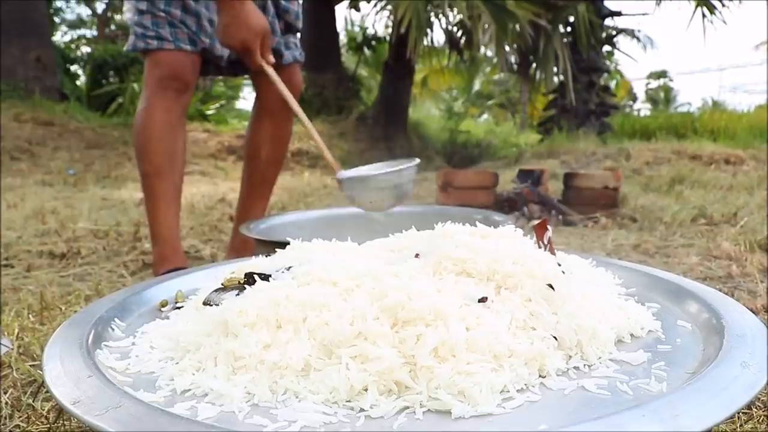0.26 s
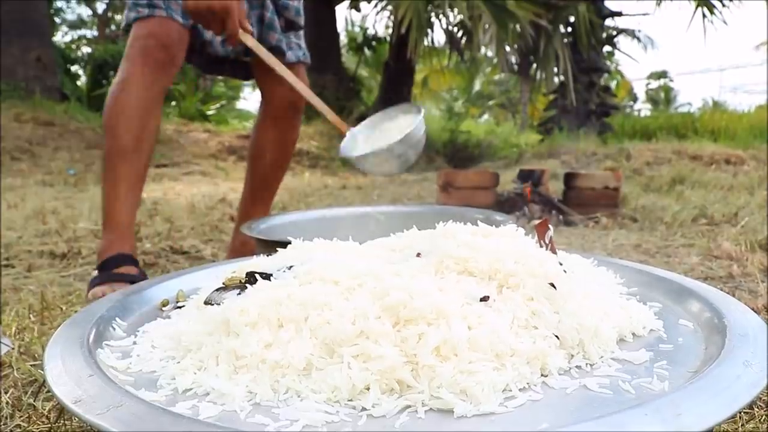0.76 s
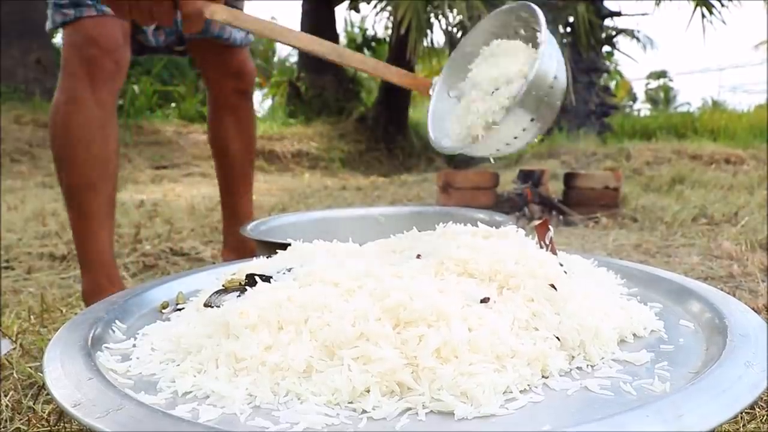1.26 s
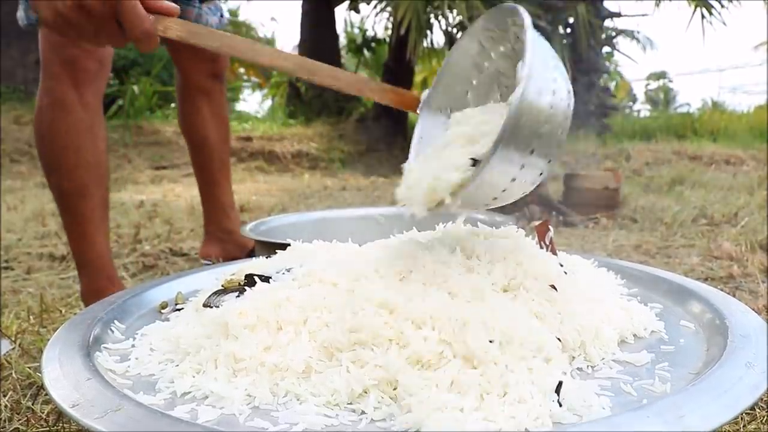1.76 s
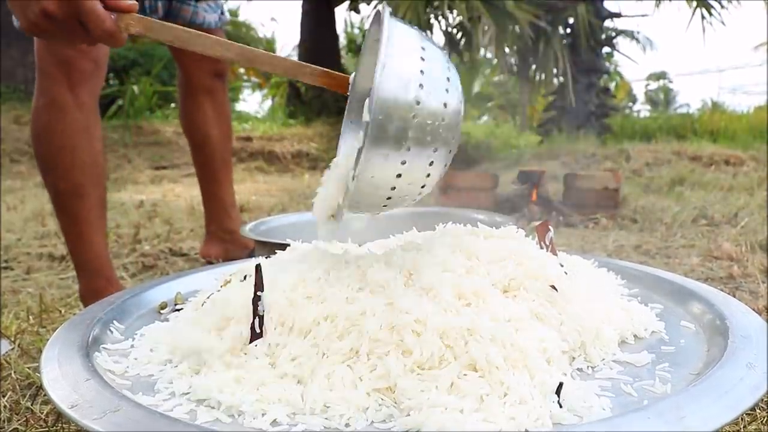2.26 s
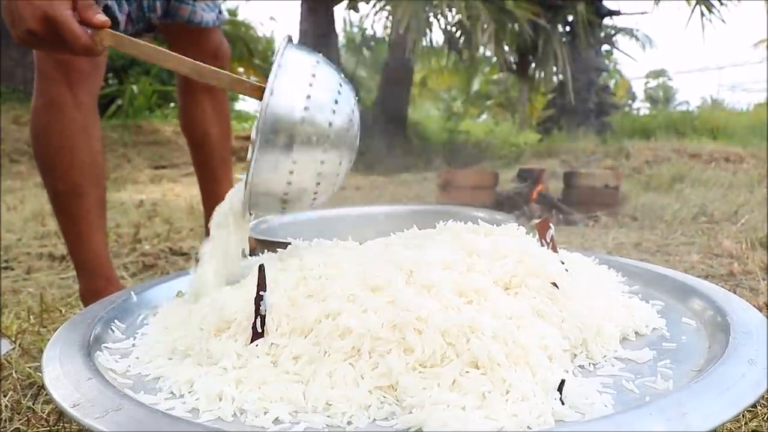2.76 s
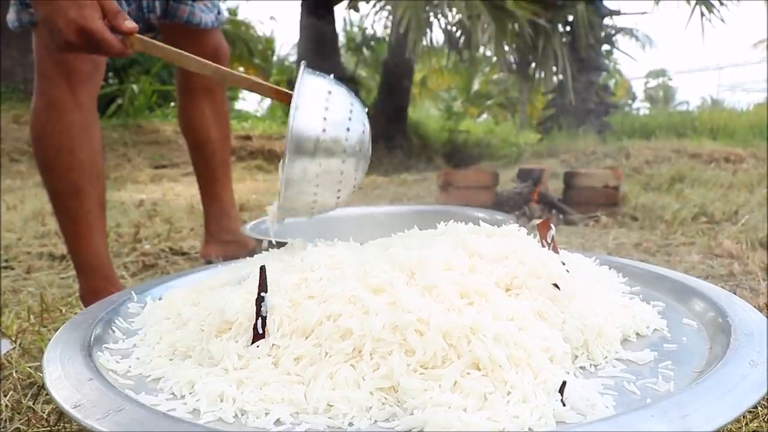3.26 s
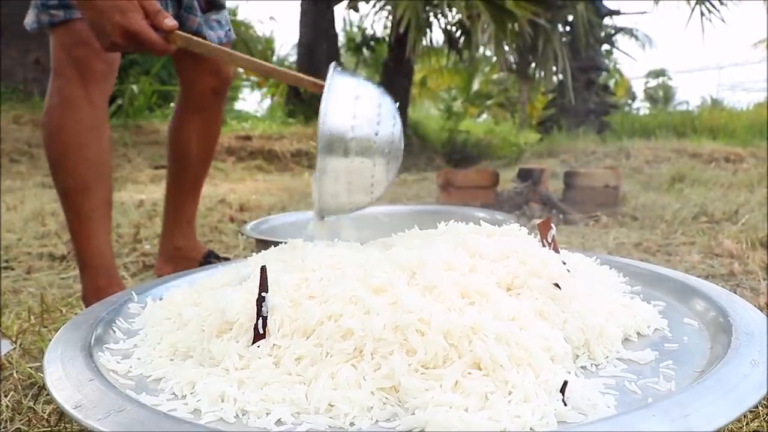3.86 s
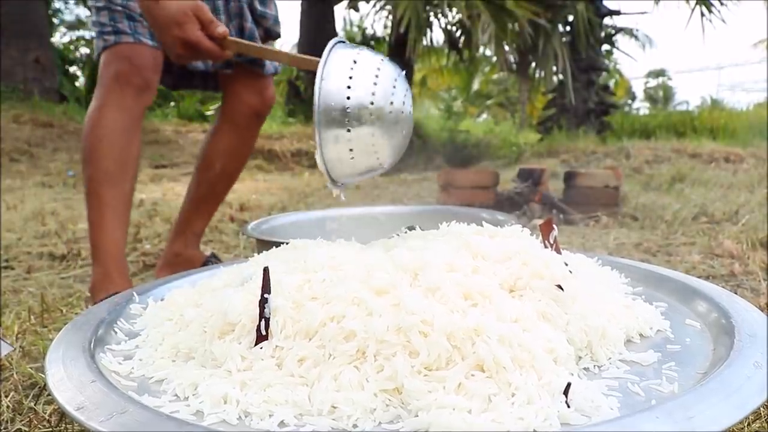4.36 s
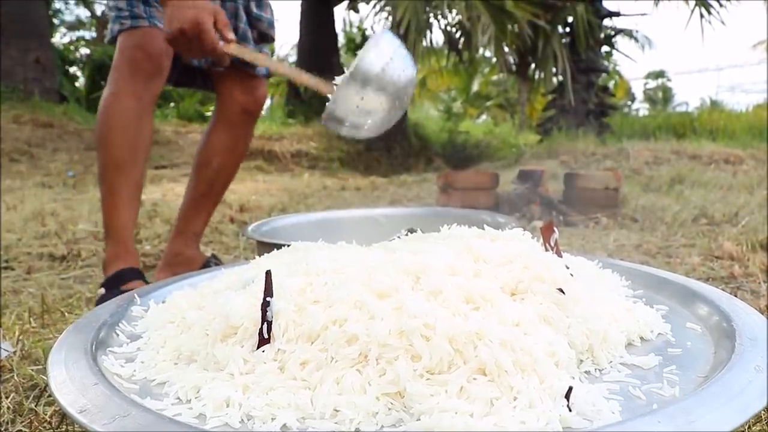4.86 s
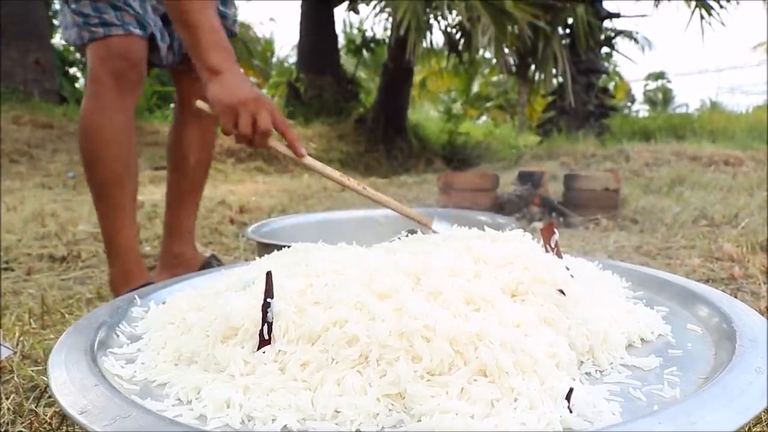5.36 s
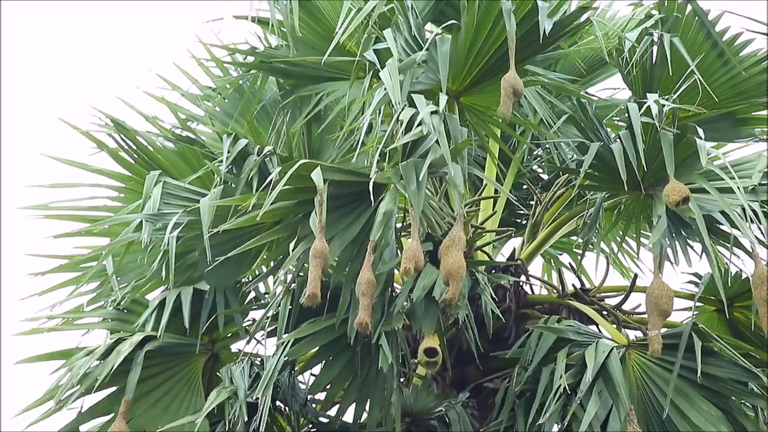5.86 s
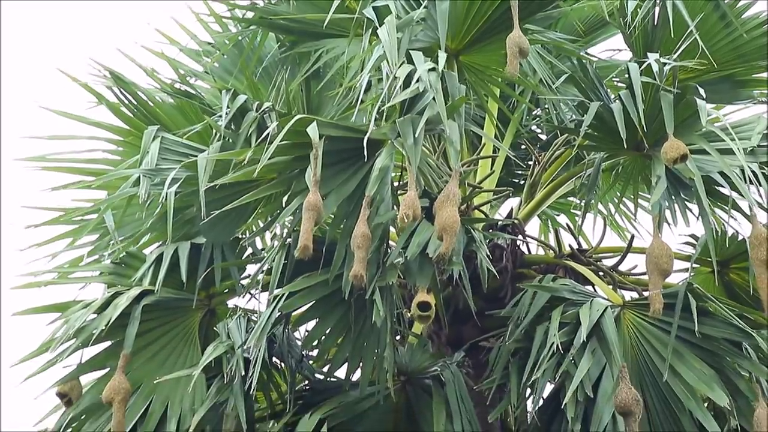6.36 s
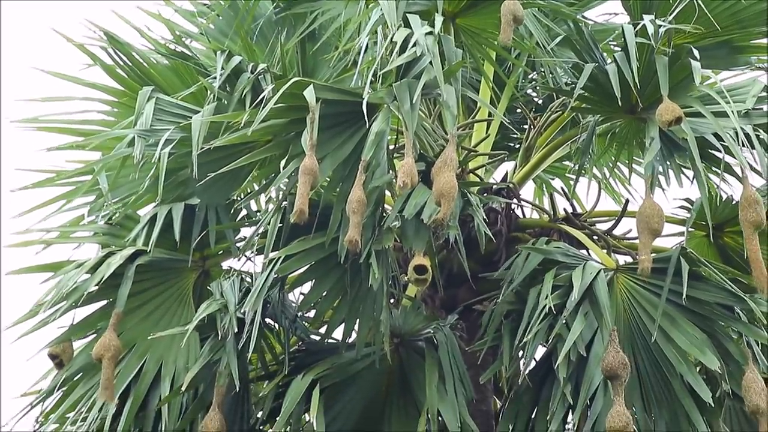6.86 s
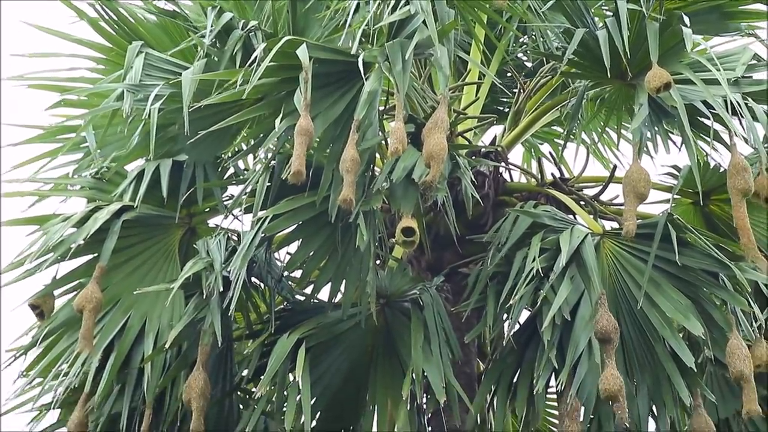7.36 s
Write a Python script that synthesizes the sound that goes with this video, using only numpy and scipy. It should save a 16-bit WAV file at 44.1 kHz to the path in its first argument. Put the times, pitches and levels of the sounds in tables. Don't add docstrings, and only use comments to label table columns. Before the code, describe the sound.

Outdoor camera sound in two contrasting places. First, low wind and subtle grass movement with sparse fire clicks, clear single bird peeps, a tiny warbling bird and a far crow. Then, without a fade, a palm tree full of weaver birds bursts in much louder, with rapid sliding chirps, doubled chatter calls, thin seeps and uneven raspy flurries over low air, and a wheeze at the end.

```python
import sys
import numpy as np
from scipy import signal
from scipy.fft import rfft, irfft, next_fast_len
from scipy.io import wavfile
from scipy.ndimage import map_coordinates

SR = 44100
rng = np.random.default_rng(int(sys.argv[2]) if len(sys.argv) > 2 else 0)


def persist_wave(psi):
    counts = np.round(np.clip(psi, -1, 1) * 32767).astype(np.int16)
    wavfile.write(sys.argv[1], SR, np.atleast_2d(counts).T)


def gain_from_decibels(decibels):
    exponent = np.asarray(decibels, float) / 20
    return 10 ** exponent


N = 335600
CUT_S = 5.504

# (time [s], length [s], middle pitch [Hz], level [dB])
ARCHED_NOTES = [(5.533, 0.024, 6500, -31), (5.584, 0.022, 6020, -32.5), (5.622, 0.025, 5750, -40),
                (6.327, 0.044, 5200, -35.5), (6.431, .035, 5700, -37.5), (6.445, 0.027, 5000, -35),
                (6.61, 0.023, 5700, -31), (6.631, 0.033, 4660, -29), (6.872, 0.0222, 5180, -32),
                (7.08, 0.01, 4800, -34), (7.269, 0.022, 5660, -33), (7.52, 0.037, 5650, -35)]
# (time [s], length [s], middle pitch [Hz], level [dB])
HOOKED_NOTES = [
    (5.857, 0.037, 4150, -32.5),
    (7.153, 0.019, 4020, -30),
    (7.24, .018, 3300, -33),
]
# (time [s], length [s], middle pitch [Hz], level [dB])
LEVEL_NOTES = [(5.672, 0.02, 8160, -42), (5.742, 0.042, 3370, -34.5), (5.995, 0.059, 4260, -33.5),
               (6.042, 0.025, 3380, -38), (6.133, 0.063, 6790, -40), (6.17, 0.033, 3940, -34.5),
               (6.19, .03, 4280, -47), (6.35, 0.031, 3516, -29.5), (6.39, .02, 3950, -39),
               (6.5, 0.04, 3450, -33), (6.538, 0.033, 4140, -30.5), (6.565, 0.041, 5420, -35.5),
               (6.688, 0.03, 4130, -32), (6.723, 0.016, 3270, -31), (6.98, 0.057, 6240, -47),
               (7.128, 0.043, 4340, -35.5), (7.151, 0.0072, 4280, -28)]
# (time [s], length [s], final pitch [Hz], level [dB])
PLUNGING_NOTES = [
    (5.504, 0.033, 4630, -30.5),
    (5.554, 0.031, 3970, -32.5),
    (5.638, 0.048, 3540, -40),
    (5.675, 0.054, 3250, -37),
    (6.876, 0.037, 3140, -32),
    (7.039, 0.044, 3180, -39),
    (7.277, 0.042, 3820, -28.5),
]
# (time [s], level [dB])
SEEPS = [
    (5.721, -41),
    (6.083, -39),
    (6.395, -40),
    (6.722, -40),
    (7.1, -41),
    (7.48, -41),
]
# (length [s], start [Hz], middle [Hz], end [Hz])
SEEP_SHAPE = (.065, 7200, 7080, 6950)
# (time [s], level [dB], extra level of later notes [dB])
CHATTER_TIMES = [
    (5.775, -24.5, -4),
    (5.92, -25, -3),
    (6.072, -25.5, -4.5),
    (6.226, -28, -20),
    (6.447, -24, -5),
    (6.597, -24.5, -2),
    (6.745, -26.5, -15),
]
# (delay [s], length [s], start [Hz], middle [Hz], end [Hz], level [dB])
CHATTER_CALL = [
    (-.014, 0.0164, 2540, 3060, 3600, -15),
    (0, .024, 3660, 3830, 3720, 1.5),
    (.024, .016, 3620, 3430, 3080, 1),
    (0.05, 0.036, 3620, 3500, 3120, -2.5),
]
# (time [s], length [s], start [Hz], middle [Hz], end [Hz], level [dB])
WHISTLE = [
    (6.77, .1, 1200, 1430, 1650, -55),
    (6.895, 0.04, 2200, 2090, 2110, -42),
    (6.955, 0.1, 2205, 2175, 2170, -38),
    (7.05, 0.092, 2170, 2190, 2180, -40.5),
    (7.15, .02, 2130, 2050, 1850, -50),
    (7.27, .036, 1860, 1885, 1910, -44),
    (7.315, .08, 1920, 1990, 2050, -54),
]
# (time [s], level [dB])
MUTTERS = [
    (5.805, -53),
    (5.862, -52),
    (5.952, -57),
    (6.012, -51),
    (6.17, -51),
    (6.39, -51),
    (6.535, -48),
    (6.698, -49),
]
# (length [s], start [Hz], middle [Hz], end [Hz])
MUTTER_SHAPE = (.02, 2080, 2050, 2000)
# (time [s], level [dB], overtone level [dB])
LOOP_TIMES = [
    (5.647, -32, -22),
    (5.848, -39, -22),
    (6.071, -38, -22),
    (6.284, -30, -20),
    (6.53, -32, -24),
    (6.752, -28.5, -24),
    (6.964, -31, -5),
    (7.174, -30, -9),
    (7.406, -34, -7),
]
# (delay [s], length [s], start [Hz], middle [Hz], end [Hz], level [dB])
LOOP_CALL = [
    (0, .022, 3300, 5450, 5650, -2),
    (.019, .022, 5700, 4400, 3830, 0),
    (.038, .01, 3820, 3780, 3800, 0),
    (.045, .014, 3850, 4850, 4750, -2),
    (.057, .022, 4750, 3700, 2750, -4),
]
# (time [s], level [dB])
BUZZ_LEVEL = [
    (7.265, -68),
    (7.3, -24.5),
    (7.4, -30),
    (7.5, -30),
    (7.61, -27),
]
# (centre [Hz], width [Hz], level [dB])
BUZZ_THROAT = [(3950, 480, -0.5), (4800, 180, 0.5), (5250, 970, -5)]
# (time [s], level [dB])
CROWD_EFFORT = [
    (5.52, -48),
    (5.62, -52),
    (5.75, -31),
    (5.96, -30.5),
    (6.32, -35),
    (6.62, -27),
    (6.88, -31.5),
    (7.13, -44.5),
    (7.32, -35.5),
]
# (frequency [Hz], level [dB])
CROWD_COLOUR = [(1500, -42), (2500, -2.5), (4000, -14.5), (5600, 11.5), (6500, -7), (7900, -12),
                (9300, -20.5), (15800, -35.5)]
# (time [s], level [dB], extra hiss [dB])
SQUABBLES = [(5.53, -35, -18), (5.661, -31.5, -10.5), (5.74, -39, -23), (5.87, -37, -9.5), (6.1, -39, -5),
             (6.18, -57, -12), (6.32, -32.5, -9), (6.451, -29, -19.5), (6.6, -29.5, -15.5),
             (6.76, -35, -10.5), (6.89, -31, -21), (6.994, -37, 4), (7.07, -41, -3.5), (7.201, -38.5, 5),
             (7.27, -35, -15), (7.39, -31, -14), (7.45, -37, 1), (7.53, -28, -15), (7.6, -43, -11)]
# (time [s], half length [s], level change [dB])
PAUSES = [(5.62, .015, -4), (5.824, .008, -0.5), (6.052, 0.011, 0), (6.22, 0.011, 1.5),
          (6.278, 0.014, -2.5), (6.405, .025, -1.5), (6.726, .012, -2.5), (6.836, 0.022, -5.5),
          (6.949, .02, -5), (7.125, 0.031, -3), (7.262, 0.0089, 0.5)]
# (time [s], level [dB], pitch [Hz], tail level [dB], overtone level [dB])
PEEPS = [(.445, -34, 3560, -13, -23), (.845, -36.5, 3563, -7.5, -22), (1.262, -46.5, 3530, -3.5, -10.5),
         (1.74, -54, 3534, 4.5, -14), (2.14, -51.5, 3520, 6, -17), (2.575, -53.5, 3465, 5, -11),
         (3.03, -50, 3540, -6, -11), (3.475, -46.5, 3500, -8.5, -12.5), (3.925, -69, 3430, 15.5, -11),
         (4.335, -44, 3490, -7.5, -15), (4.752, -42.5, 3526, -5, -19), (5.14, -40, 3500, -8, -16.5)]
# (time [s], level [dB], extra level of high notes [dB])
WARBLES = [(0.513, -56, -7), (0.838, -56, -11), (1.153, -55.5, -9.5), (1.473, -56, -11), (1.789, -57.5, -5),
           (2.114, -56.5, -10), (2.442, -55, -8), (2.772, -55, -10), (3.094, -55, -8), (3.417, -54.5, -10),
           (3.739, -60, -7), (4.064, -60, -14), (4.388, -56.5, -9), (4.716, -60, -19)]
# (delay [s], length [s], start [Hz], middle [Hz], end [Hz], level [dB])
WARBLE_PHRASE = [
    (-.078, .013, 5500, 5250, 4900, 8),
    (-.062, .03, 6650, 6850, 5750, 4),
    (-.028, .028, 4350, 4540, 4300, 2.5),
    (0, .027, 5195, 4280, 3880, 3.5),
]
# (time [s], length [s], third partial [dB], fourth at start [dB], fourth at end [dB])
CAWS = [
    (0.741, 0.52, -51.5, -14, 1.5),
    (1.493, 0.41, -47.5, -4, -7),
    (3.971, 0.56, -52.5, -20, 4.5),
    (4.662, 0.47, -48, 4, -4),
    (6.797, 0.29, -54, 10.5, 16.5),
]
# (open pitch [Hz], opens after [s], a third of the final sag [Hz])
CAW_PITCH = [
    (482, 0.13, 13.5),
    (470.5, .04, 7.5),
    (457, .11, 6.5),
    (460, .05, 0),
    (502.5, 0.09, 4.5),
]
# (time [s], peak level [dB], bright part [dB], dull part [dB])
FIRE_SNAPS = [(0.1148, -31, -22, -25), (0.1413, -34.5, -18, -7), (0.168, -31, -17, -15),
              (0.195, -31, -21, -21), (0.2173, -31.5, -13, -20), (0.253, -37, -10, -9),
              (0.2705, -44, -20, 4), (0.908, -41, -27, 13), (1.284, -27.5, -41, -18),
              (1.3753, -24.5, -17, -47), (2.017, -43.5, -14.5, 5), (2.271, -52, -16, -11),
              (2.5018, -35.5, -31, -21), (2.719, -49.5, -25, 7.5), (3.063, -37, -10, -14),
              (3.3727, -33.5, -29, -19), (3.5394, -44, -19, -10), (4.0706, -30, -38, -12),
              (4.2315, -48, 4, -2), (4.6448, -37, -17, -31), (4.9036, -27.5, -9, -24),
              (5.4212, -36, -21, -15)]
# (time [s], half length [s], level [dB])
FOOTSTEPS = [(.01, 0.15, -68), (0.67, 0.094, -76.5), (1.01, 0.1, -67.5), (1.287, 0.13, -78),
             (1.554, 0.11, -64.5), (3.72, 0.077, -71.5), (3.945, 0.062, -66.5), (4.082, 0.045, -79),
             (4.456, 0.2, -82), (4.86, 0.1, -67), (5.148, 0.13, -77)]
# (frequency [Hz], level [dB])
GRASS_COLOUR = [(400, 6.5), (2000, 7.5), (5000, 10), (9000, 1), (15000, -6)]
# (time [s], level [dB])
WIND_LEVEL = [(0.0, -55.5), (0.23, -58.5), (0.31, -59), (0.49, -55.5), (0.79, -60.5), (0.87, -55.5),
              (1.48, -60.5), (1.61, -56), (1.96, -58), (2.51, -58.5), (2.61, -60), (4.48, -57.5),
              (4.62, -63), (4.89, -54), (5.11, -59), (5.18, -53.5), (5.44, -62.5), (5.49, -55)]
# (frequency [Hz],
# level [dB])
WIND_COLOUR = [(15, -43), (25, -11), (107, 3.5), (193, 1.5), (2170, -16.5), (3170, -21), (3440, -8),
               (3720, -17.5), (5430, -38), (8580, -53), (15500, -64)]
# (frequency [Hz], level [dB])
COLONY_AIR_COLOUR = [(15, -34), (25, -3.5), (102, -4), (130, -6.5), (216, -6), (357, -9.5), (431, -9),
                     (540, -10), (2200, -12.5), (2860, -30), (4840, -120)]


def unit(x):
    return x / np.sqrt(np.mean(x ** 2) + 1e-20)


def curves(rows):
    s, *columns = np.transpose(rows)
    return [np.interp(np.arange(N) / SR, s, column) for column in columns]


def wobble(rate, size=N):
    knots = rng.standard_normal(int(size * rate / SR) + 4)
    return map_coordinates(knots, [np.arange(size) * rate / SR])


def filtered(x, response):
    m = next_fast_len(N + 8192)
    return irfft(rfft(x, m) * response(np.fft.rfftfreq(m, 1 / SR)), m)[..., :N]


def coloured(x, points):
    f, db = np.transpose(points)
    return unit(filtered(x, lambda hz: gain_from_decibels(np.interp(np.log(hz + 1), np.log(f), db))))


def band(x, lo_hz, hi_hz):
    return signal.sosfilt(signal.butter(2, [lo_hz, hi_hz], "bandpass", fs=SR, output="sos"), x)


def rush(points, width):
    shared, apart = rng.standard_normal((2, N))
    return coloured(np.array([shared + width * apart, shared - width * apart]), points)


def notes(rows, rough_db, overtone_db, edge=0.073):
    out = np.zeros(N + SR)
    for s, length, hz0, hz1, hz2, db in rows:
        u = np.linspace(0, 1, int(length * SR))
        pitch = np.polyval(np.polyfit([0, .5, 1], [hz0, hz1, hz2], deg=2), u)
        turn = 2 * np.pi * np.cumsum(pitch) / SR
        shape = np.sin(np.pi / 2 * np.clip(np.minimum(u, 1 - u) / edge, 0, 1))
        size = gain_from_decibels(db + 2.0 + rough_db * wobble(440, size=len(u)))
        tone = np.sin(turn) + gain_from_decibels(overtone_db) * np.sin(2 * turn)
        out[int(s * SR):][:len(u)] += size * shape * tone
    return out[:N]


def echoes(x, t60):
    tail = rng.standard_normal((2, SR // 2)) * gain_from_decibels(-60 * np.arange(SR // 2) / SR / t60)
    return signal.fftconvolve(x[None], tail / np.linalg.norm(tail[0]), axes=1)[:, :N]


def near_notes():
    kinds = [(ARCHED_NOTES, (.87, .88)), (HOOKED_NOTES, (1.08, .66)), (LEVEL_NOTES, (1.01, .985))]
    rows = [(s, n, hz * a, hz, hz * b, db) for table, (a, b) in kinds for s, n, hz, db in table]
    plunge, share = 1.42, .5
    for s, n, hz, db in PLUNGING_NOTES:
        rows.append((s, n * share, hz * plunge, hz * plunge ** .4, hz, db - 2))
        rows.append((s + n * share - .002, n * (1 - share), hz, hz, hz * .985, db))
    return rows + [(s, *SEEP_SHAPE, db) for s, db in SEEPS]


def buzz():
    beats = np.diff(np.floor(np.cumsum(236 + 30 * wobble(120)) / SR), prepend=0)
    pulses = beats * gain_from_decibels(1.4 * rng.standard_normal(N)) + 0.1 * rng.standard_normal(N)

    def throat(f):
        ring = 0
        for k, (centre, width, db) in enumerate(BUZZ_THROAT):
            damping = 1j * f * width
            ring = ring + (-1) ** k * gain_from_decibels(db) * damping / (centre * centre - f * f + damping)
        return ring ** 2 / (1 + (3450 / (f + 1)) ** 10)

    return gain_from_decibels(curves(BUZZ_LEVEL)[0]) * unit(filtered(pulses, throat))


def near_birds():
    chatter = [(s + ds, n, a, b, c, db + d + later_db * (ds > 0))
               for s, db, later_db in CHATTER_TIMES for ds, n, a, b, c, d in CHATTER_CALL]
    rows = near_notes()
    low = [row for row in rows if 2300 < row[3] < 4950]
    other = [row for row in rows if not 2300 < row[3] < 4950]
    left = notes(low, rough_db=3, overtone_db=-24)
    left += notes(chatter, rough_db=1.5, overtone_db=-26) + buzz()
    central = notes(other, rough_db=5.5, overtone_db=-36)
    soft = WHISTLE + [(s, *MUTTER_SHAPE, db) for s, db in MUTTERS]
    central += gain_from_decibels(1.5 * wobble(30)) * notes(soft, rough_db=2, overtone_db=-36, edge=.07)
    for s, db, overtone_db in LOOP_TIMES:
        call = [(s + ds, n, a, b, c, db + d) for ds, n, a, b, c, d in LOOP_CALL]
        central += notes(call, 1.5, overtone_db)
    direct = left * gain_from_decibels([[2.7], [-5]]) + central * gain_from_decibels([[.7], [-.7]])
    return direct + gain_from_decibels(-7.5) * echoes(left + central, t60=.11)


def squabbles():
    s, db, hiss_db = np.transpose(SQUABBLES)[:, :, None]
    late = np.arange(N) / SR - s
    flares = gain_from_decibels(db + np.minimum(397 * late, -181 * late))
    shrill = gain_from_decibels(-47.5) + flares.sum(axis=0)
    hiss = gain_from_decibels(-53) + (gain_from_decibels(hiss_db) * flares).sum(axis=0)
    return shrill, hiss


def crowd():
    when, length, hz, arch, fall, size, side = rng.random((1100, 7)).T
    hz = 3300 * 1.7 ** hz
    end_hz = np.maximum(hz * (.9 - .3 * fall), 2750)
    rows = np.transpose([CUT_S - .1 + 2.2 * when, .01 + .02 * length, hz * (.7 + .36 * arch),
                         hz, end_hz, 5 * size])
    chirps = np.array([notes(rows[heard], rough_db=5, overtone_db=-34) for heard in (side < .6, side > .4)])
    rasp = gain_from_decibels(2.2 * wobble(300) + 1.5 * wobble(45)) * rush(CROWD_COLOUR, width=.8)
    scattered = echoes(chirps.sum(axis=0), t60=.15)
    birds = 0.7 * unit(chirps) + .6 * unit(scattered) + .7 * unit(rasp)

    def above(f, hz):
        return .5 + .5 * np.tanh((f - hz) / 350)

    edges = [(-SR, 4300), (4300, 6600), (6600, SR)]
    bands = [unit(filtered(birds, lambda f: above(f, lo) - above(f, hi))) for lo, hi in edges]
    shrill, hiss = squabbles()
    low_part = gain_from_decibels(curves(CROWD_EFFORT)[0] - 6.0) * gain_from_decibels([[2.8], [-4.5]]) * bands[0]
    shrill_part = gain_from_decibels([[-1.5], [-3.5]]) * shrill * bands[1]
    hiss_part = gain_from_decibels(2.5) * hiss * gain_from_decibels([[.3], [-.3]]) * bands[2]
    t = np.arange(N) / SR
    hush = gain_from_decibels(sum(db * np.exp(-((t - s) / half) ** 2) for s, half, db in PAUSES))
    return hush * (low_part + shrill_part + hiss_part)


def peeping_bird():
    peeps, t = np.zeros(N + SR), np.arange(SR // 3) / SR
    for s, db, hz, tail_db, overtone_db in PEEPS:
        swell = np.exp(-((t - .046) / 0.017) ** 2)
        tail = gain_from_decibels(tail_db - 60 * (t / 0.32) ** 2.5) * np.clip(t / 0.02, 0, 1)
        waver = .7 + .45 * wobble(38, size=len(t))
        high_waver = 0.13 + 0.52 * wobble(61.7, size=len(t))
        sag = .025
        turn = 2 * np.pi * hz * t * (1 - sag * t / 2) + .6 * wobble(45, size=len(t))
        low = (swell + tail * waver) * np.sin(turn)
        high = (swell + 3 * tail * high_waver) * np.sin(2 * turn)
        peeps[int((s - .008) * SR):][:len(t)] += gain_from_decibels(db) * (low + gain_from_decibels(overtone_db) * high)
    return peeps[:N]


def warbler():
    rows = [(s + ds, n, a, b, c, db + d + high_db * (a > 5200))
            for s, db, high_db in WARBLES for ds, n, a, b, c, d in WARBLE_PHRASE]
    song = gain_from_decibels(-2) * notes(rows, rough_db=5, overtone_db=-40)
    return song + gain_from_decibels(-29) * echoes(song, t60=0.12)


def crow():
    out = np.zeros(N)
    breath = unit(band(rng.standard_normal(N), 940, 1940))
    attack_s, release_s, edge_db = 0.098, 0.18, -8.5
    for (s, length, top_db, closed_db, open_db), (open_hz, opens_s, sag_hz) in zip(CAWS, CAW_PITCH):
        u = np.clip((np.arange(N) / SR - s) / length, 0, 1)
        edge = np.clip(1 - length * np.minimum(u / attack_s, (1 - u) / release_s), 0, 1)
        db = top_db + 1.15 * wobble(14) + edge_db * edge
        fourth_db = closed_db + (open_db - closed_db) * u
        second_db = -17 + 2.2 * (top_db - CAWS[0][2]) + 23.5 * (s > CUT_S)
        shake = 21 * wobble(200) + 5 * wobble(25)
        opening = 28 * (1 - np.tanh((u * length - opens_s) / .03))
        turn = 2 * np.pi * np.cumsum(open_hz - opening - 3 * sag_hz * u ** 2 + shake) / SR
        chop = 1 + .45 * np.sin(turn / 5.1 + 2.5 * wobble(30))
        tone = np.sin(3 * turn) + gain_from_decibels(second_db) * np.sin(2 * turn)
        tone += gain_from_decibels(fourth_db) * (np.sin(4 * turn) + 0.24 * np.sin(5 * turn))
        fade = np.clip(9 * np.minimum(u, 1 - u), 0, 1)
        out += gain_from_decibels(db) * chop * (tone + .6 * breath) * fade
    return 1.16 * out + gain_from_decibels(-15) * echoes(out, t60=0.3)


def fire():
    snaps, t = np.zeros(N), np.arange(SR // 50) / SR
    for s, db, bright_db, dull_db in FIRE_SNAPS:
        crack = rng.standard_normal(len(t)) * gain_from_decibels(-60 * t / 0.01)
        parts = band(crack, 2340, 6700)
        parts += gain_from_decibels(bright_db) * band(crack, 4400, 17500)
        parts += gain_from_decibels(dull_db + 10.5) * band(crack, 1110, 2210)
        snaps[int(s * SR):][:len(t)] += gain_from_decibels(db + 2.5) * parts
    return snaps


def grass():
    s, half, db = np.transpose(FOOTSTEPS)[:, :, None]
    steps = gain_from_decibels(db) * np.exp(-((np.arange(N) / SR - s) / half) ** 2)
    level = gain_from_decibels(-69.5) + steps.sum(axis=0)
    grains = 1 + 1.8 * (rng.random(N) < 500 / SR)
    return level * gain_from_decibels(9.5 + 1.1 * wobble(25)) * rush(GRASS_COLOUR, width=0.17) * unit(grains)


def wind():
    hits = rng.standard_normal(N) * (rng.random(N) < 90 / SR)
    thuds = coloured(hits, [(60, -4), (250, 5.5), (900, -2.5), (3000, -82)])
    gusts = gain_from_decibels(1.2 * wobble(12))
    return gain_from_decibels(curves(WIND_LEVEL)[0] + 3.5) * (gusts * rush(WIND_COLOUR, width=0.088) + 0.58 * thuds)


def colony_air():
    air = gain_from_decibels(-50.5 + 0.7 * wobble(5)) * rush(COLONY_AIR_COLOUR, width=0.7)
    hum = gain_from_decibels(-59 + 1.4 * wobble(6.9)) * np.sin(2 * np.pi * 100 * np.arange(N) / SR)
    return air + hum


def colony():
    birds = near_birds() + crowd()
    birds = np.array([np.roll(birds[0], shift=2), birds[1]])
    return birds + colony_air()


def field():
    return peeping_bird() + warbler() + fire() + grass() + wind()


def scene():
    after = np.clip((np.arange(N) / SR - CUT_S) / 0.00036, 0, 1)
    return (1 - after) * field() + after * colony() + crow()


def top_cut(x):
    return signal.sosfilt(signal.butter(12, 16650, fs=SR, output="sos"), x)


def record(dry):
    mix = filtered(dry, lambda hz: hz < 15830)
    return top_cut(mix)


dry = scene()
out = record(dry)
persist_wave(out)
```